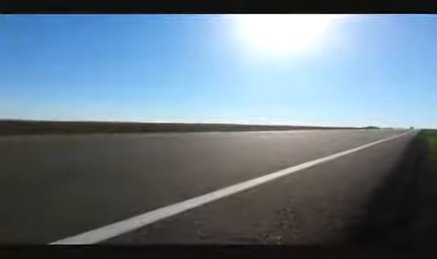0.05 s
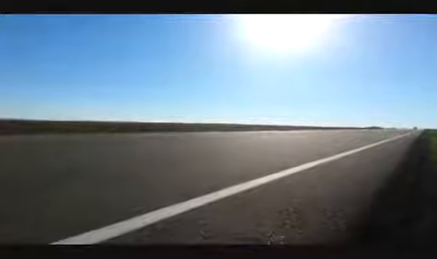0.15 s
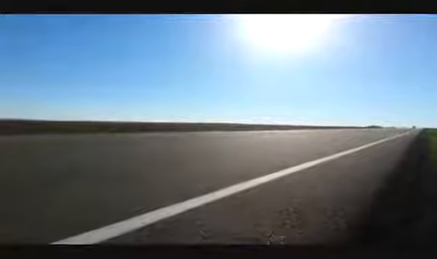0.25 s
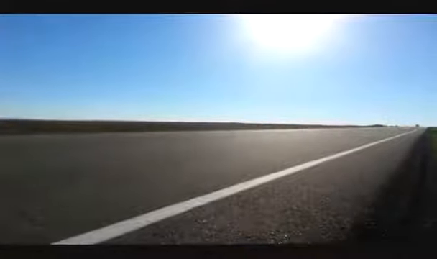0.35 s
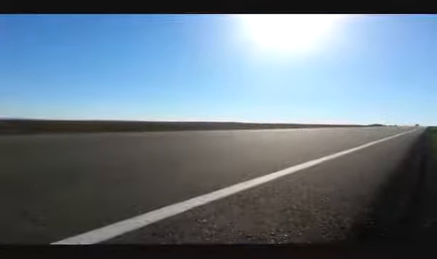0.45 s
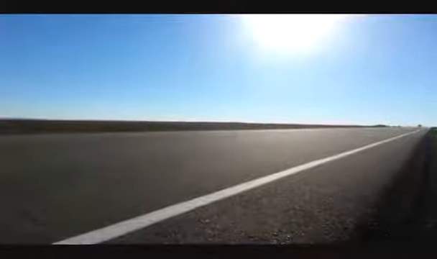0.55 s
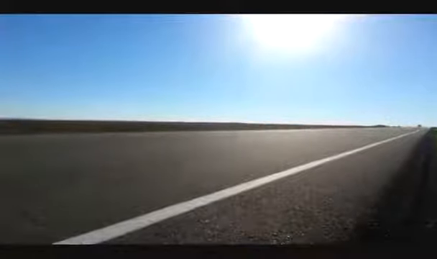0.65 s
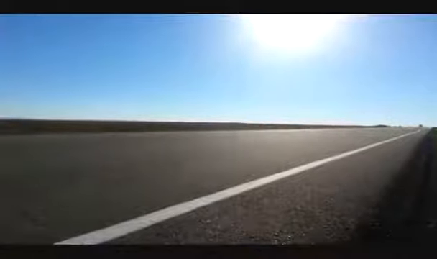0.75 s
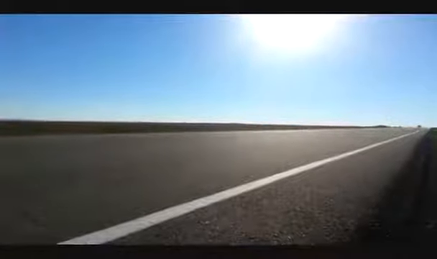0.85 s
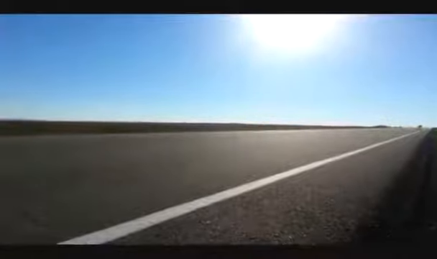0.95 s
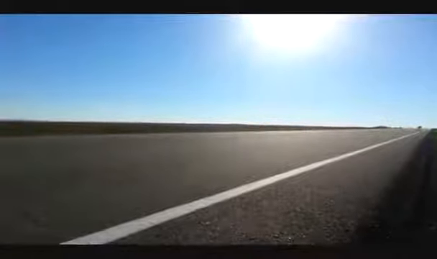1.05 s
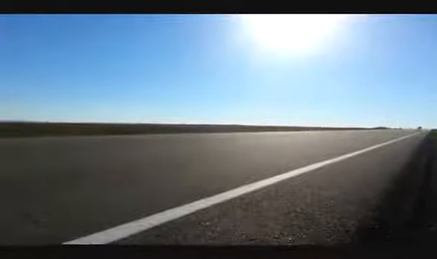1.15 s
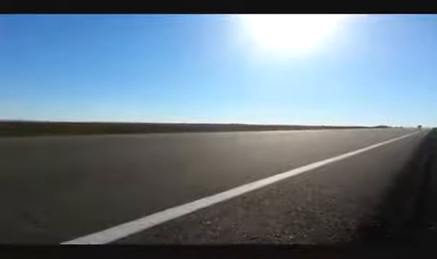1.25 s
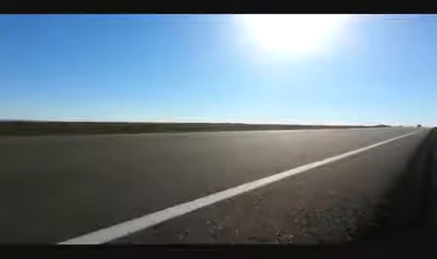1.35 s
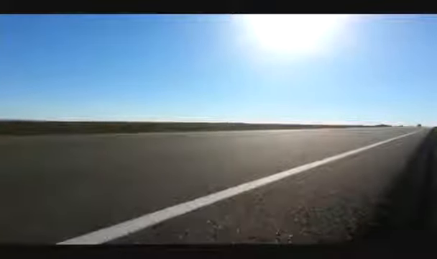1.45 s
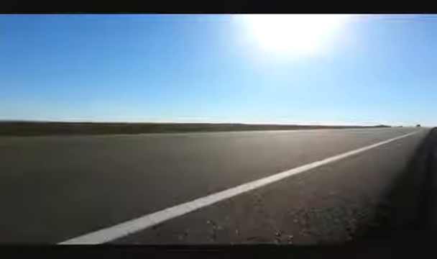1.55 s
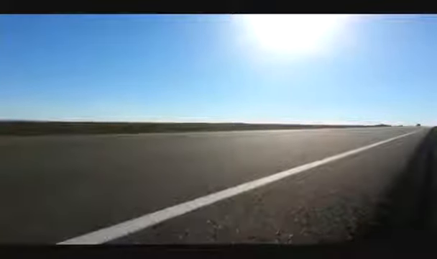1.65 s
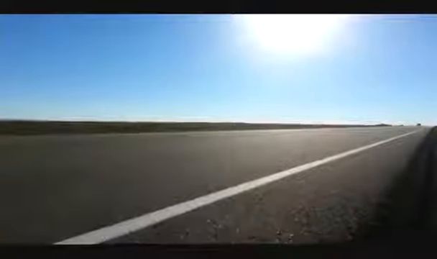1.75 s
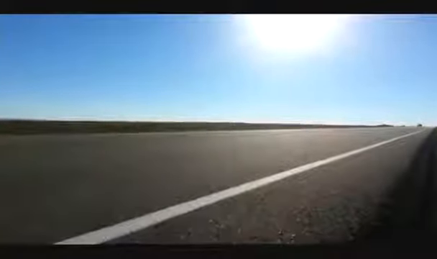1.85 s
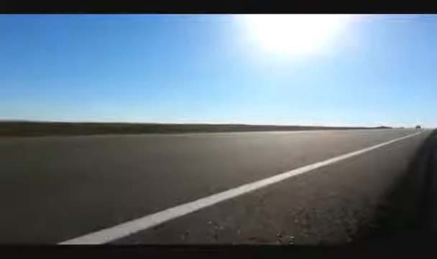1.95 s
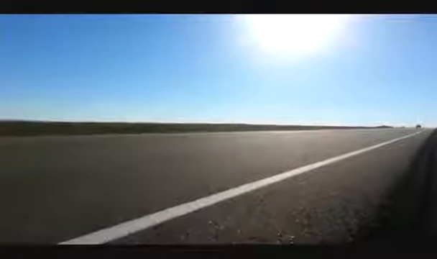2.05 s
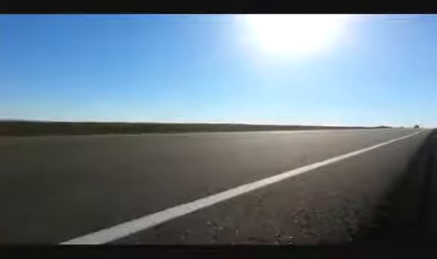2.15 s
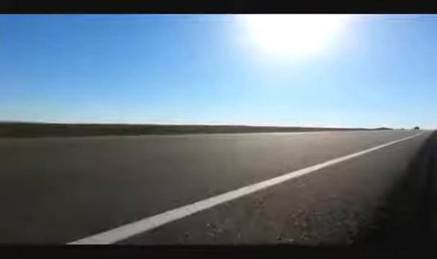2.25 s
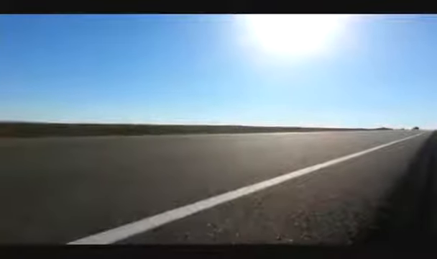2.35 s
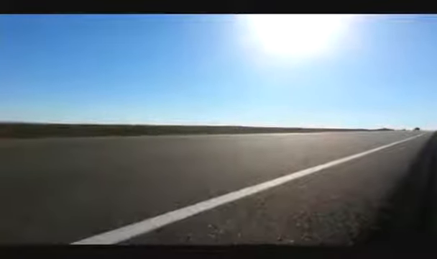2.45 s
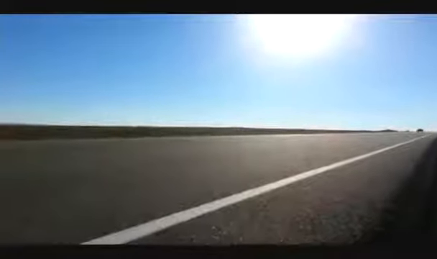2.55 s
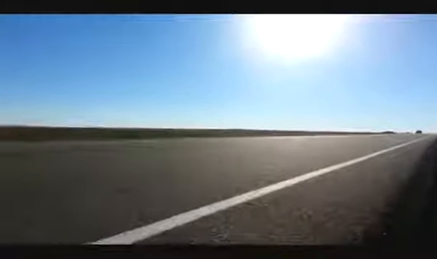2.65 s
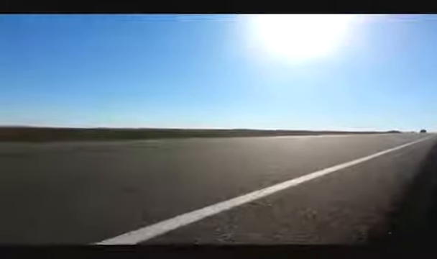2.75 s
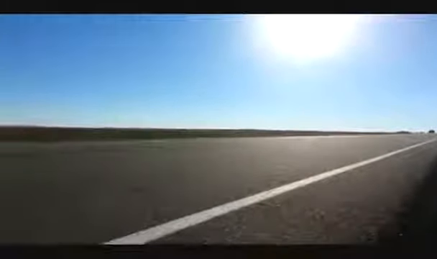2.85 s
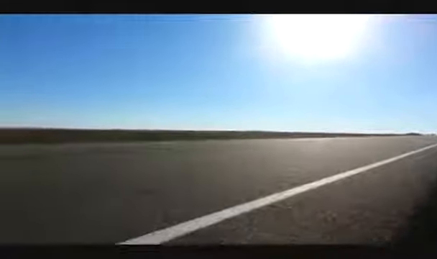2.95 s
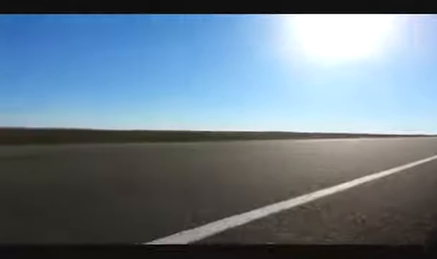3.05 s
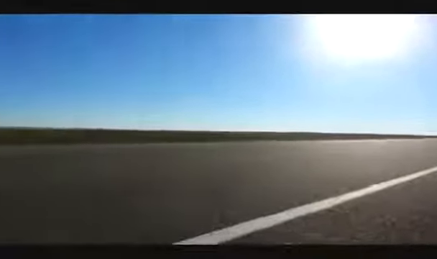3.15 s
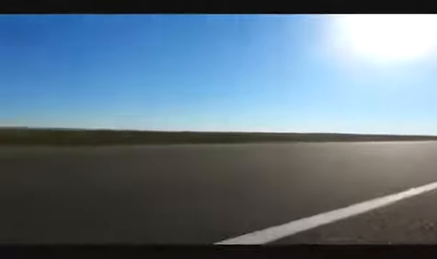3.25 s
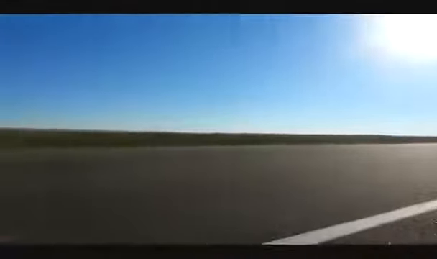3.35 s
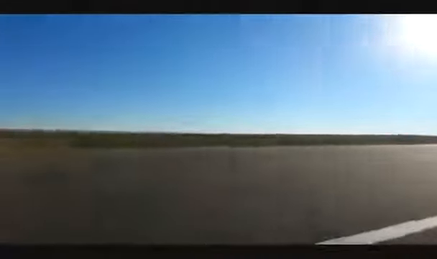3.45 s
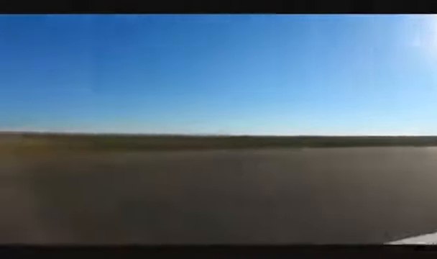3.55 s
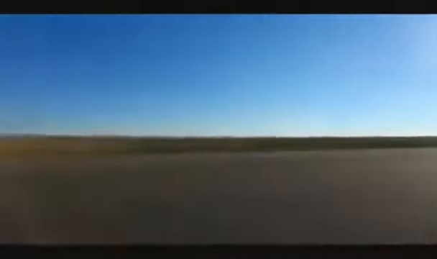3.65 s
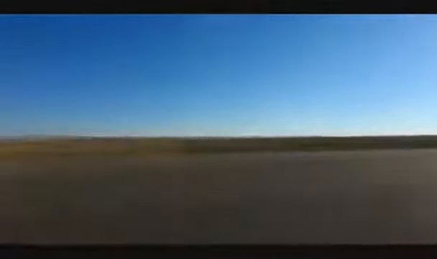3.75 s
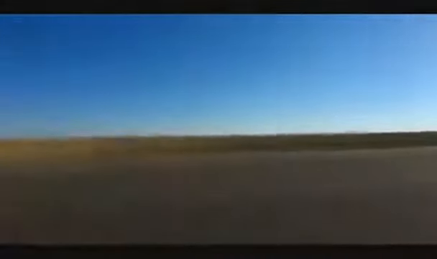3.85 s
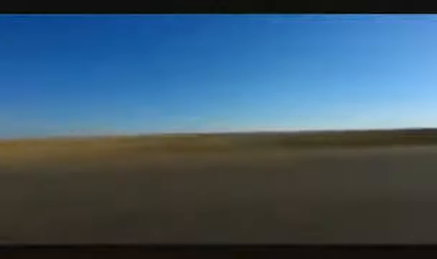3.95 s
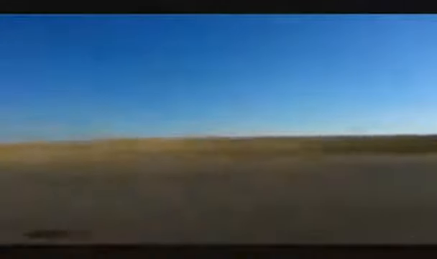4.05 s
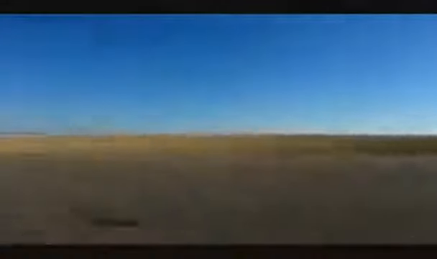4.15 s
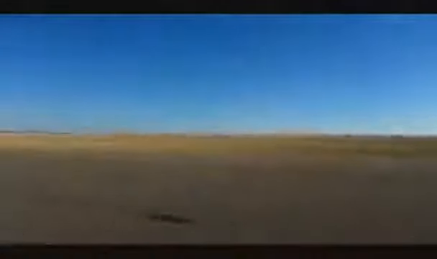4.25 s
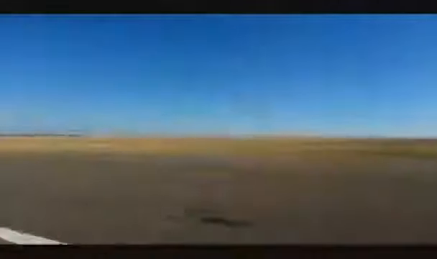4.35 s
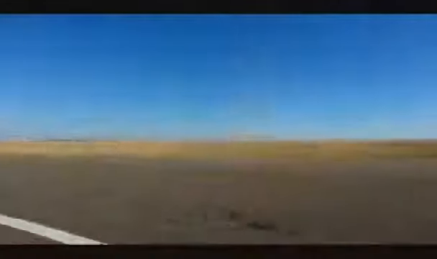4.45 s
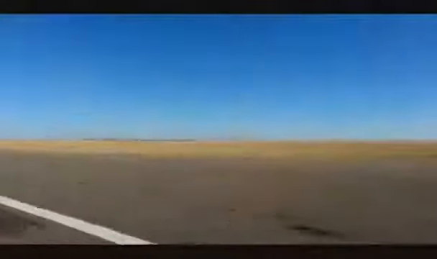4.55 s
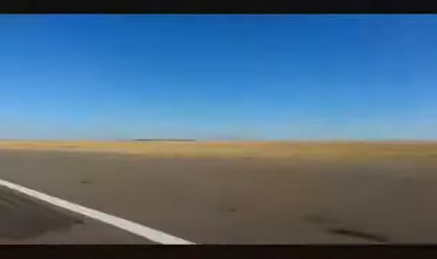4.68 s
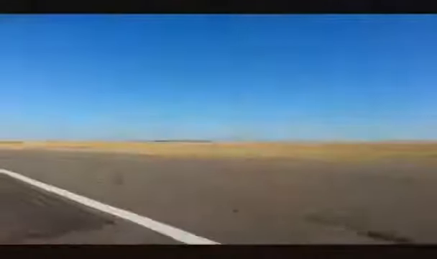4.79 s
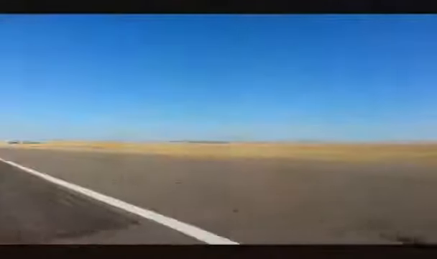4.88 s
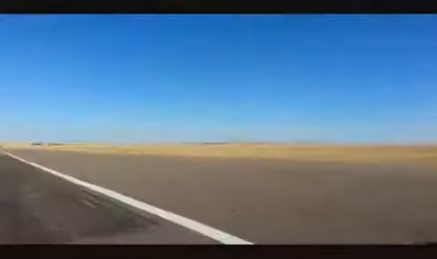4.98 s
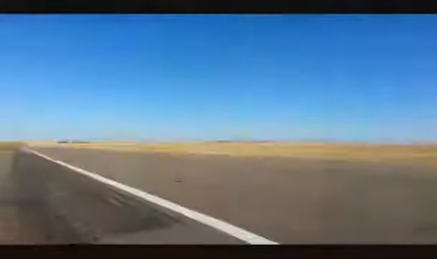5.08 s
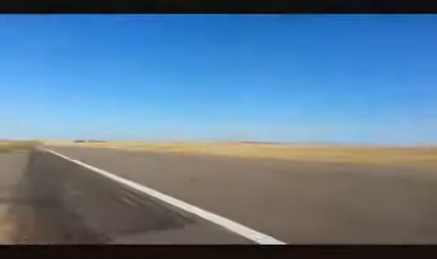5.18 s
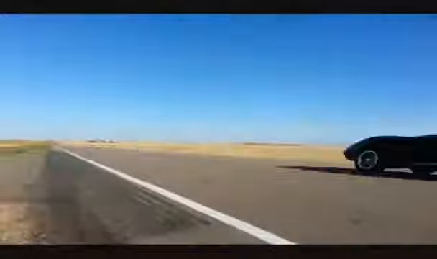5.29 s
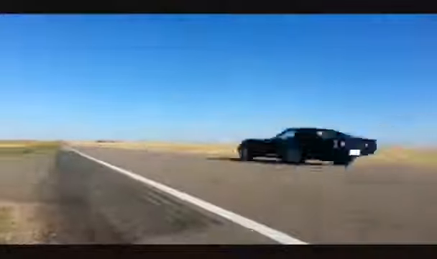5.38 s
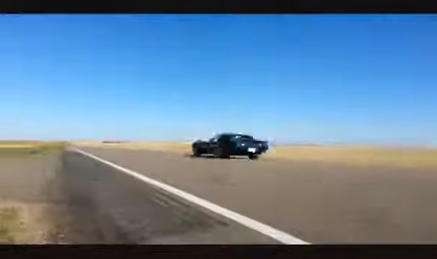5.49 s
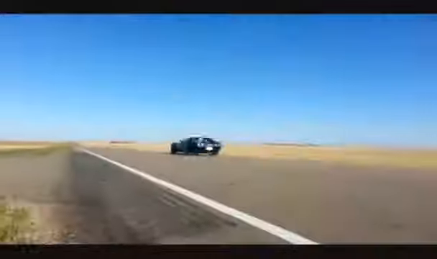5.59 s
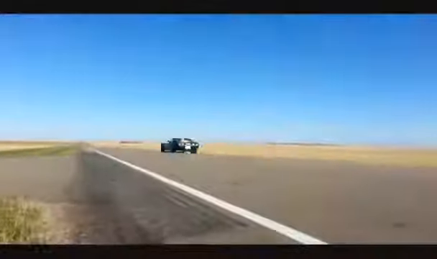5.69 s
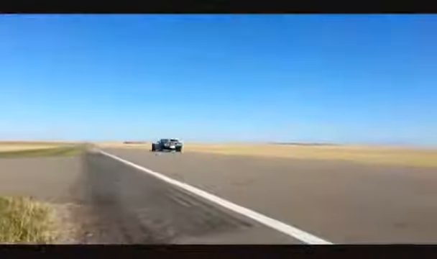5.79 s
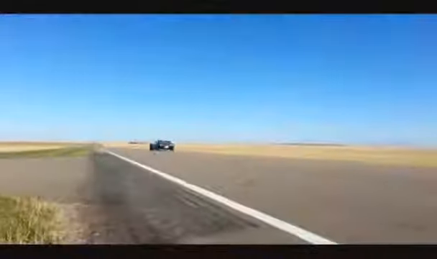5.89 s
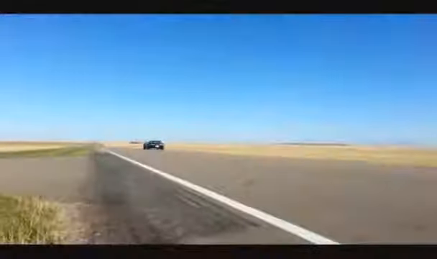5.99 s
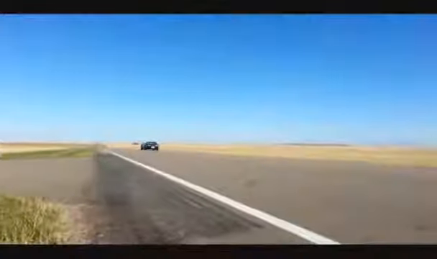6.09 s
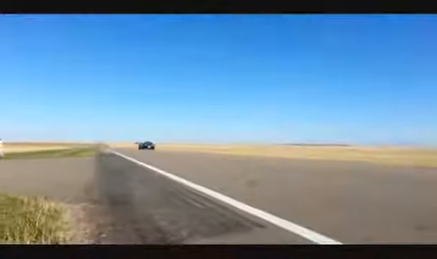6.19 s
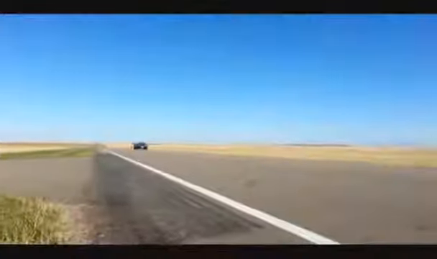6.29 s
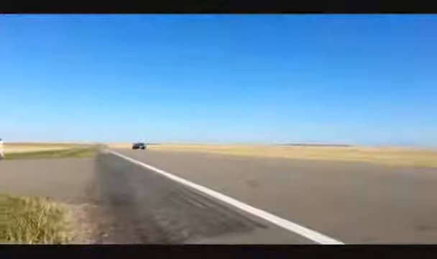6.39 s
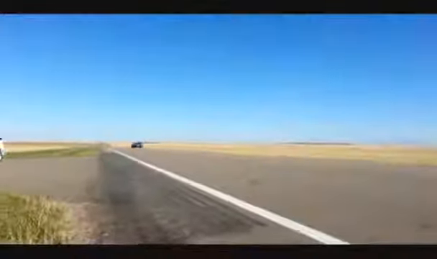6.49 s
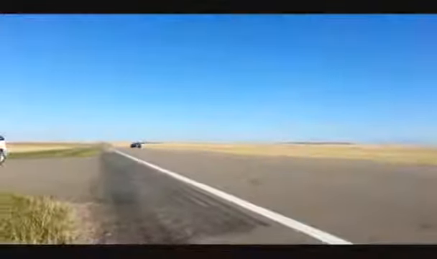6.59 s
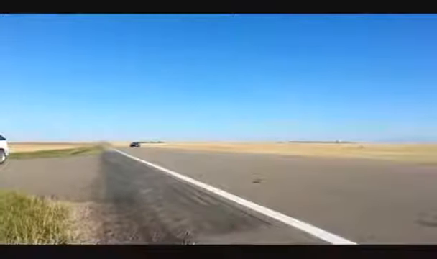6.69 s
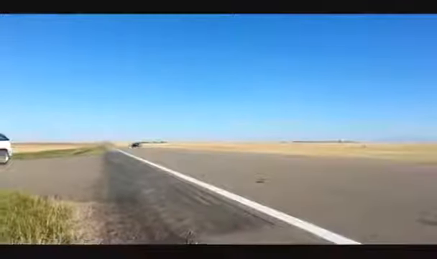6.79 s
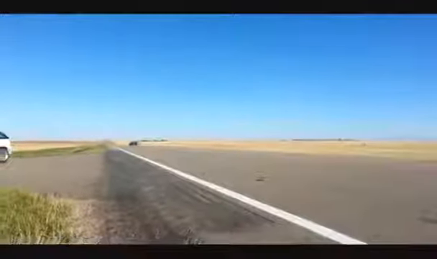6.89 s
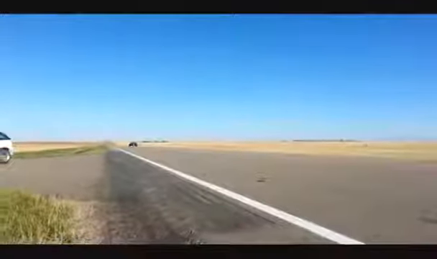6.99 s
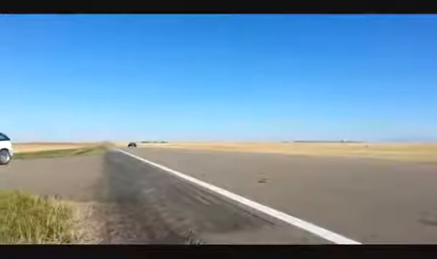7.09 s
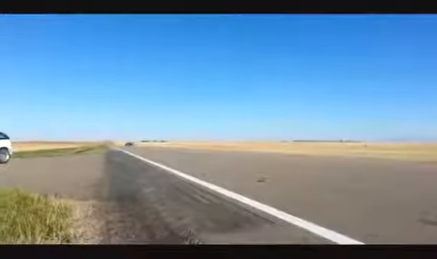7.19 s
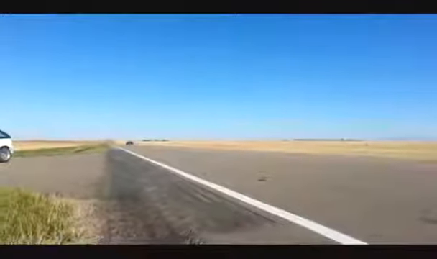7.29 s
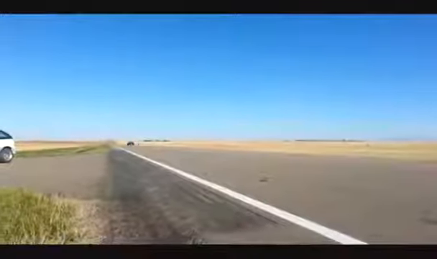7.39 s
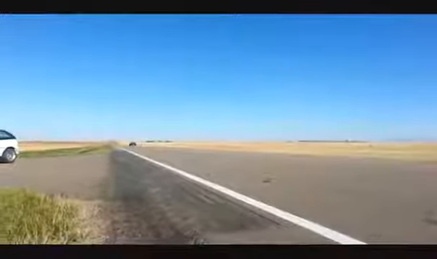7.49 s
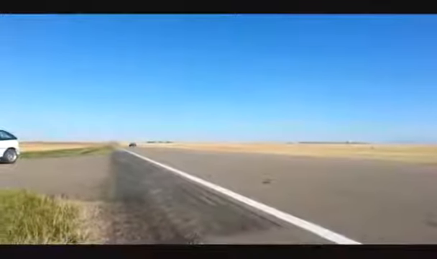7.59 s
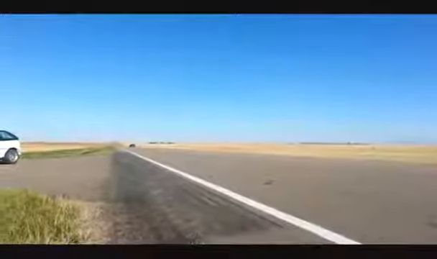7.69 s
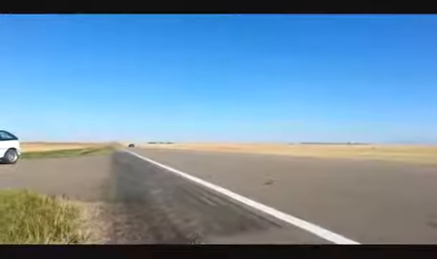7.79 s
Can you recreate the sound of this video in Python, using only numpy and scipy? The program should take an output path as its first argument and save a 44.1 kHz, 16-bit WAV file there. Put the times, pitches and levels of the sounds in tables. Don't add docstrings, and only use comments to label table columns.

```python
import sys
import numpy as np
from scipy import signal
from scipy.fft import irfft, next_fast_len
from scipy.io import wavfile
from scipy.ndimage import map_coordinates

SR = 44100
rng = np.random.default_rng(int(sys.argv[2]) if len(sys.argv) > 2 else 0)


def int16_out(signal):
    q = np.round(np.clip(np.atleast_2d(signal).T, -1, 1) * 32767)
    wavfile.write(sys.argv[1], SR, q.astype(np.int16))


def ratio_of_db(decibels):
    return 10 ** (np.asarray(decibels, float) / 20)


N = 345303

SIDE_S = [
    1.5,
    3.7,
    4.801,
    5.25,
    5.6,
    6.2,
    7.4,
]
# (order of the engine cycle [1], level [dB])
NOTE_FAR = [(1, -41), (2, -30.5), (3, -25.5), (4, -10), (5, -12.5), (6, -9.5), (7, -14.5), (8, 0), (9, -9),
            (10, -1.5), (11, -15.5), (12, -12.5), (13, -18.5), (14, -15), (15, -26.5), (16, -17)]
NOTE_NEARING = [(1, -60), (2, -31), (3, -23.5), (4, -8.5), (5, -14), (6, -9.5), (7, -13), (8, 3.5),
                (9, -12.5), (10, -3.5), (11, -10), (12, -16.5), (13, -3.5), (14, -27.5), (15, -33),
                (16, -13)]
NOTE_NOSE = [(1, -46.5), (2, -34), (3, -19.5), (4, -10), (5, 4.5), (6, -12.5), (7, -11.5), (8, -4),
             (9, -4.5), (10, -13.5), (11, -1.5), (12, -25.5), (13, -3.5), (14, -22.5), (15, -34), (16, -23)]
NOTE_ABEAM = [(1, -29), (2, -23), (3, -16), (4, -18), (5, 4.5), (6, -19.5), (7, -8), (8, 4.5), (9, 2.5),
              (10, 3.5), (11, 4.5), (12, -22.5), (13, 2.5), (14, -19), (15, -17.5), (16, -3.5)]
NOTE_PAST = [(1, -37.5), (2, -26), (3, -14), (4, -9.5), (5, 3), (6, -22), (7, -13), (8, -1.5), (9, -0.5),
             (10, 1), (11, 2), (12, -8), (13, -1.5), (14, -8.5), (15, -23), (16, -9)]
NOTE_TAIL = [(1, -52), (2, -43), (3, -28.5), (4, -21), (5, 5.5), (6, -29.5), (7, -34.5), (8, -13.5),
             (9, 7.5), (10, -2.5), (11, 6.5), (12, -18), (13, -8.5), (14, -8), (15, -20.5), (16, -3)]
NOTE_LEAVING = [(1, -48), (2, -39.5), (3, -15.5), (4, -12), (5, -12.5), (6, 0), (7, -27), (8, -0.5), (9, 2),
                (10, -14), (11, 2.5), (12, -8.5), (13, -10), (14, -11), (15, -9.5), (16, -27.5)]
# (frequency [Hz], density [dB per Hz])
RASP = [(110, -10), (170, -1), (300, 2.5), (450, 0), (620, -4)]
RASP_DB = [-8, -6.5, -12, -10, -13, -7.5, -5.5]
NOTE_PAN_DB = [-1.1, -1, 1, 0.89, -0.59, .3, .3]
# (frequency [Hz], density [dB per Hz])
ROAR_FAR = [(360, -32), (620, -8.5), (684, -50), (786, -23), (973, 13), (1060, -4.5), (1290, -8),
            (1550, -1), (1910, -13.5), (4400, -16.5), (5720, -58), (9680, -120)]
ROAR_NEARING = [(360, -31), (620, -6), (705, -1), (902, 2), (1030, 3.5), (1180, -2.5), (2060, -7.5),
                (3090, -24.5), (4640, -33), (8000, -43), (10400, -48), (17600, -120)]
ROAR_NOSE = [(620, -5), (950, 7), (1900, 2.5), (2700, -15), (3900, -13), (5200, -26), (8700, -39.5),
             (11000, -39.5), (14000, -68.5)]
ROAR_ABEAM = [(360, -30), (620, -14.5), (1020, 0), (1100, -9), (1630, -1.5), (2000, -10.5), (2890, -14),
              (4300, -13.5), (5400, -33), (11300, -30.5), (13000, -40)]
ROAR_PAST = [(360, -35), (620, -13.5), (908, -13), (1350, -8.5), (2030, -11), (3080, -10.5), (3930, -25),
             (4290, -23.5), (11300, -26), (12400, -30.5), (13000, -59)]
ROAR_TAIL = [(360, -36), (620, -17), (792, -12.5), (1350, -7.5), (1470, -11.5), (1850, -6), (2650, -13),
             (3120, -2), (3430, -10), (9010, -35), (10000, -46), (13000, -73), (22000, -120)]
ROAR_LEAVING = [(360, -42), (620, -20), (768, -9), (1040, -8), (1340, -8), (1490, -10.5), (2100, -13),
                (2360, -17), (3470, -19.5), (6320, -47.5), (8000, -45), (10400, -83), (17600, -120)]
ROAR_DB = [-9, -6.5, -7, -8.5, -3, -1.5, 4]
HISS_DB = [-26, -26, -18, -16.5, -16, -12, -11.5]
# (time [s], left delay of the note [ms], left delay of the roar [ms])
BEARING = [(0, -.147, -.26), (2.9, -.165, -.25), (3.95, -.39, -.46), (4.3, -.386, -.43),
           (4.85, -.348, -.27), (5.35, -.41, -.41), (5.68, .025, .02), (6.4, .12, .13), (7.83, .14, .14)]
# (time [s], rate [Hz])
REVS = [(0, 34.5), (.35, 34.58), (1.4, 35.65), (2.3, 36.45), (3.35, 37.09), (4.3, 37.46), (5.0, 37.94),
        (5.7, 37.57), (6.7, 37.75), (7.5, 36.97), (7.83, 36.9)]
# (time [s], level [dB])
CAR_LEVEL = [(0, -40), (.4, -39), (1.4, -36.5), (2.3, -34), (3.35, -27), (3.9, -23), (4.4, -18),
             (4.72, -10), (5.0, -7.5), (5.26, -4), (5.42, -4.5), (5.5, -8), (6.1, -12.5), (6.75, -17),
             (7.05, -22.5), (7.25, -26.5), (7.83, -28.5)]
# (time [s], lift [dB], length [s])
SWELLS = [(2.298, 13, 0.33), (4.3, 16, 0.47), (5.513, 16, 0.093), (6.096, 9.5, 0.045), (6.3, 8, 0.082),
          (6.43, 10, 0.059), (6.773, 13.5, 0.15), (7.65, 21, 0.11)]
# (time [s], left minus right below the split [dB], above the split [dB])
SHADE = [(3.0, -4.5, 3.5), (3.82, -4.5, 6), (4.24, -3.0, 0.5), (4.96, 7.5, -7), (5.45, -2.5, 3.5),
         (5.6, -1.0, -2.0), (6.34, -2, -7.5), (6.99, -0.5, -4.5), (7.17, -2.0, -12.0), (7.83, 1, -5.5)]
# (time [s], extra path [ms], share [1])
ARM_MIRROR = [(3.4, 0.93, 0.38), (3.8, 0.84, 0.39), (4.3, 0.5, 0.31), (4.7, 0.17, 0.094)]
# (frequency [Hz], density [dB per Hz])
FIELD = [(30, -14.5), (100, -8), (400, -16), (2000, -0.5), (5000, -34.5), (7000, -17), (9000, -4),
         (14000, -16.5)]
# (start [s], swell [s], end [s], fade [s], level [dB])
KATYDID = [
    (-.2, .1, .31, .03, -56),
    (1.45, 0.61, 3.7, 0.13, -54.5),
    (7.0, .6, 7.9, .1, -64),
]
# (time [s], level [dB])
LEFT_CHIRPS = [(.268, -57), (.631, -56), (.965, -55), (1.335, -55), (1.669, -56), (2.007, -55),
               (2.374, -57), (2.77, -55)]
# (time [s], level [dB])
RIGHT_CHIRPS = [(-.062, -57), (.199, -56), (.426, -55.5), (.706, -55), (.961, -54), (1.235, -53),
                (1.461, -55), (1.688, -54), (1.918, -57), (2.154, -55), (2.398, -53), (2.653, -53),
                (2.938, -56), (3.246, -55.5), (3.545, -59)]
# (time after the start [s], level [dB], pitch shift [Hz])
LEFT_STROKES = [(0, -1, -30), (.038, 0, 0), (.081, 0, -10)]
# (time after the start [s], level [dB], pitch shift [Hz])
RIGHT_STROKES = [(0, -3, -92), (.036, 0.5, 0), (.077, 0, 20)]
# (time [s], level [dB], length [s])
GUSTS = [
    (5.153, -31.5, 0.084),
    (5.701, -46.5, .35),
]

TIME = np.arange(N) / SR
STEP = 128
SLOW = TIME[::STEP]
SIZE = next_fast_len(N)
HZ = np.fft.rfftfreq(SIZE, 1 / SR)
METRES_PER_CYCLE, PASSES_S, KERB_M = 1.223, 5.39, 3.9
SOUND_SPEED = 343


def unit(x):
    return x / np.sqrt(np.mean(x ** 2))


def band(hz, octaves):
    place = np.log2(HZ / hz + 1e-9) / octaves
    inside = np.abs(place) < 1
    lines = rng.standard_normal((inside.sum(), 2)) @ [1, 1j]
    bins = np.zeros(len(HZ), complex)
    bins[inside] = np.cos(np.pi / 2 * place[inside]) * lines
    return unit(irfft(bins, SIZE)[:N])


def walk(rate):
    knots = rng.standard_normal(400)
    return unit(map_coordinates(knots, [SLOW * rate], order=3))


def fine(slow):
    return np.interp(TIME, SLOW, slow)


def bump(s, length_s):
    return np.exp(-((TIME - s) / length_s) ** 2)


def apart(noise):
    return np.array([noise, np.roll(noise, N // 3)])


def colour(table, hz):
    f, db = np.transpose(table)
    return np.interp(np.log(hz), np.log(f), db)


def turning(sides_db, counted):
    gain = ratio_of_db(np.array([np.interp(SLOW, SIDE_S, row) for row in np.transpose(sides_db)]))
    return gain / np.sqrt(np.sum(gain[counted] ** 2, axis=0))


def spaced(x, delay_ms, pan_db):
    shift = delay_ms * SR / 2000
    channels = []
    for side in (1, -1):
        delayed = map_coordinates(x, [np.arange(N) - side * shift], order=2, mode="nearest")
        channels.append(ratio_of_db(side * pan_db / 2) * delayed)
    return np.array(channels)


def doppler():
    revs = np.interp(TIME, *np.transpose(REVS))
    speed = METRES_PER_CYCLE * revs
    along = speed * (TIME - PASSES_S)
    return revs / (1 + speed / SOUND_SPEED * along / np.hypot(along, KERB_M))


def exhaust(hz, flutter_db=.8, slip=.15):
    notes = [NOTE_FAR, NOTE_NEARING, NOTE_NOSE, NOTE_ABEAM, NOTE_PAST, NOTE_TAIL, NOTE_LEAVING]
    gains = turning(np.array(notes)[:, :, 1], slice(3, 14))
    gains[2:5:2] *= np.tanh((SLOW - 5.39) / .08)
    cycle = np.exp(2j * np.pi * np.cumsum(hz) / SR)
    out, order = 0, 1
    for gain in gains:
        order = order * cycle
        level = ratio_of_db(flutter_db * walk(5))
        phase = slip * walk(8) + 2 * np.pi * rng.random()
        out = out + fine(gain * level * np.exp(1j * phase)) * order
    return np.sqrt(2) * out


def rasp():
    centres = 110 * 2 ** (np.arange(6) / 2)
    return unit(sum(ratio_of_db(colour(RASP, hz) + 10 * np.log10(hz)) * band(hz, .5) for hz in centres))


def road(x):
    heights_m2 = 0.422
    reach_m, nose_lead_s = 9, 0.044
    speed = METRES_PER_CYCLE * np.interp(TIME, *np.transpose(REVS))
    away = np.hypot(speed * (TIME - PASSES_S + nose_lead_s), KERB_M)
    share = .72 * np.exp(-(away / reach_m) ** 2)
    late = TIME - 2 * heights_m2 / away / SOUND_SPEED
    x = signal.sosfilt(signal.cheby1(8, 1, 12600, fs=SR, output="sos"), x)
    dull = signal.sosfiltfilt(signal.butter(3, 3840, fs=SR, output="sos"), x)
    echo = share * np.array([np.interp(late, TIME, side) for side in dull])
    return x - dull + (dull + echo) / np.sqrt(1 + share ** 2)


def shaded(x):
    s, *columns = np.transpose(SHADE)
    low_db, high_db = (np.interp(TIME, s, c) * [[.5], [-.5]] for c in columns)
    low = signal.sosfiltfilt(signal.butter(3, 3000, fs=SR, output="sos"), x)
    out = ratio_of_db(low_db) * low + ratio_of_db(high_db) * (x - low)
    s, *columns = np.transpose(ARM_MIRROR)
    late_ms, share = (np.interp(TIME, s, c) for c in columns)
    reflected = np.interp(TIME - late_ms / 1000, TIME, out[0])
    left = (out[0] + share * reflected) / np.sqrt(1 + share ** 2)
    return np.array([left, out[1]])


def roar(hiss_db, ring_db, delay_ms, alike_hz=5200):
    centres = 620 * 2 ** (np.arange(19) / 4)
    sides = [ROAR_FAR, ROAR_NEARING, ROAR_NOSE, ROAR_ABEAM, ROAR_PAST, ROAR_TAIL, ROAR_LEAVING]
    sides_db = np.array([colour(t, centres) + 10 * np.log10(centres) for t in sides])
    body = turning(sides_db[:, :9], slice(1, 9))
    hiss = turning(sides_db[:, 9:], slice(0, 5)) * ratio_of_db(hiss_db[::STEP])
    hiss[5:] *= ratio_of_db(5.6 * np.exp(-((SLOW - 5.41) / 0.048) ** 2))
    narrow = np.interp(SLOW, [5.1, 5.35, 5.5, 5.65], [1, .85, .6, 1])
    ring = band(1335, 0.06) + ratio_of_db(-6) * band(1900, 0.1)
    direct = np.interp(TIME, [5.4, 5.8], [0, 1]) * ratio_of_db(ring_db - 1) * ring
    scattered = 0
    for hz, gain in zip(centres, [*body, *hiss]):
        alike = narrow / (1 + (hz / alike_hz) ** 2)
        gain = gain * ratio_of_db(1.3 * walk(3) + 1.2 * walk(11))
        direct = direct + fine(np.sqrt(alike) * gain) * band(hz, 1 / 4)
        scattered = scattered + fine(np.sqrt(1 - alike) * gain) * apart(band(hz, 1 / 4))
    return shaded(road(spaced(direct, delay_ms, 0) + scattered))


def car():
    note_db = np.interp(TIME, *np.transpose(CAR_LEVEL))
    by_side = (RASP_DB, NOTE_PAN_DB, ROAR_DB, HISS_DB)
    rasp_db, note_pan_db, roar_db, hiss_db = (np.interp(TIME, SIDE_S, c) for c in by_side)
    swell_db = sum(db * bump(s, length_s) for s, db, length_s in SWELLS)
    roar_db = roar_db + 0.14 * swell_db
    ring_db = -14.5 + swell_db
    s, *columns = np.transpose(BEARING)
    note_ms, roar_ms = (np.interp(TIME, s, c) for c in columns)
    note = exhaust(doppler())
    puffs = unit(1 + 0.095 * np.abs(note))
    pipes = spaced(note.real + ratio_of_db(rasp_db) * rasp(), note_ms, note_pan_db)
    gas = ratio_of_db(roar_db + 1.5) * puffs * roar(hiss_db - roar_db, ring_db - roar_db, roar_ms)
    return ratio_of_db(note_db) * (pipes + gas)


def field(level_db=-56):
    out, gust = 0, walk(0.87)
    for hz in 30 * 2 ** np.arange(0, 9, .5):
        mid, side = apart(band(hz, .5)) * [[1], [min(hz / 700, 1)]]
        gust_db = 3.6 * gust * min(90 / hz, 1) + walk(4.1)
        level = ratio_of_db(colour(FIELD, hz) + 10 * np.log10(hz) + gust_db)
        out = out + fine(level) * np.array([mid + side, mid - side])
    return ratio_of_db(level_db) * unit(out)


def throb(hz, sharp, first_s):
    beat = hz * (TIME - first_s) + .05 * fine(walk(2))
    return unit(np.exp(sharp * np.cos(2 * np.pi * beat)))


def katydids():
    rest_db = -78.5
    bouts_db = rest_db
    for start, swell, end, fade, db in KATYDID:
        lift = db - rest_db
        bouts_db = bouts_db + np.interp(TIME, [start, start + swell, end, end + fade], [0, lift, lift, 0])
    beats = throb(45.2, .6, 2.16)
    buzz = ratio_of_db(bouts_db) * beats * ratio_of_db(np.array([[3], [-3]])) * apart(band(12140, 0.45))
    pace = throb(18.91, 2.5, .659)
    ticks = np.interp(TIME, [0, .6, 3.0, 3.4], [0.21, 0.48, 1.0, 0.24]) * pace * band(8340, 0.071)
    chorus = ratio_of_db(-64.0) * apart(band(4900, 0.18))
    return chorus + buzz + ticks * ratio_of_db(np.array([[-72], [-69]]))


def crickets(length_s=.026, fall_hz=600):
    out = np.zeros((2, N))
    t = np.arange(int(length_s * SR)) / SR - length_s / 2
    # chirps, strokes, pitch [Hz], left minus right [dB]
    singers = [(LEFT_CHIRPS, LEFT_STROKES, 5130, 6), (RIGHT_CHIRPS, RIGHT_STROKES, 4890, -5)]
    for chirps, strokes, hz, pan_db in singers:
        sides_db = np.array([[pan_db], [-pan_db]]) / 2
        for start_s, db in chirps:
            for after_s, soft_db, shift_hz in strokes:
                cycles = (hz + shift_hz) * t - fall_hz * t ** 2 / length_s / 2
                stroke = np.hanning(len(t)) * np.sin(2 * np.pi * cycles)
                i = int((start_s + after_s - length_s / 2) * SR)
                if i >= 0:
                    out[:, i:i + len(t)] += ratio_of_db(db + soft_db + sides_db) * stroke
    return out * (1 + .4 * apart(band(250, 1.5)))


def wake():
    push = ratio_of_db(-58.5) + sum(ratio_of_db(db) * bump(s, length_s) for s, db, length_s in GUSTS)
    mid = band(80, .9) + ratio_of_db(-29.0) * band(57, 1.0)
    side = ratio_of_db(-5.0) * band(69, 0.42)
    return push * fine(ratio_of_db(1.0 * walk(6.5))) * np.array([mid + side, mid - side])


def handling():
    t = np.clip(TIME - 3.35, 0, None)
    return ratio_of_db(-24) * t / .002 * np.exp(-t / .002) * np.sin(2 * np.pi * 1500 * t)


def scene():
    return car() + wake() + crickets() + katydids() + field() + handling()


def gate_treble(x, floor_db=-82, follow=.8, from_hz=3200):
    f, _, cells = signal.stft(x, SR, nperseg=2048)
    power = np.abs(cells[:, :1024]) ** 2 + 1e-14
    loud_db = 10 * np.log10(power.sum(axis=1, keepdims=True))
    band_db = 10 * np.log10(power.reshape(2, 128, 8, -1).sum(axis=2))
    whim_db = 5.1 * rng.standard_normal(band_db.shape)
    threshold_db = floor_db + follow * (loud_db + 38)
    keep = np.repeat(band_db + whim_db > threshold_db, 8, axis=1)
    cells[:, :1024] *= keep | (f[:1024, None] < from_hz)
    return signal.istft(cells, SR, nperseg=2048)[1][:, :N]


def top_cut(x):
    return signal.sosfilt(signal.butter(12, 14310, fs=SR, output="sos"), x)


def record(dry):
    rounded = 1.3 * dry / (1.3 ** 4 + dry ** 4) ** .25
    top = signal.ellip(8, .2, 70, 14400, fs=SR, output="sos")
    thin = gate_treble(signal.sosfilt(top, rounded))
    mix = np.clip(thin, -1, 1)
    return top_cut(mix)


dry = scene()
out = record(dry)
int16_out(out)
```